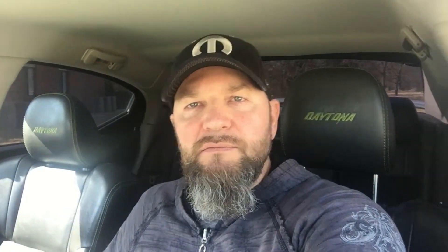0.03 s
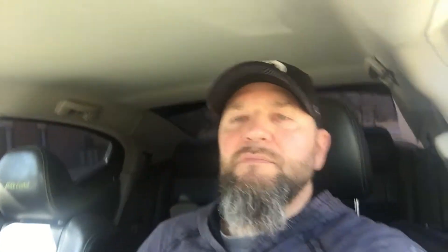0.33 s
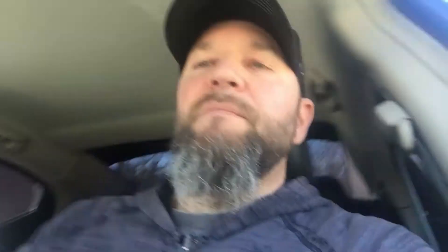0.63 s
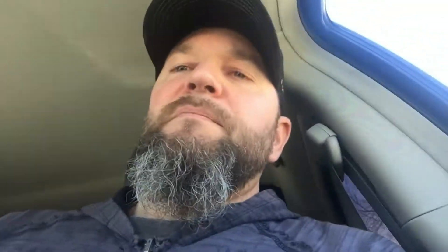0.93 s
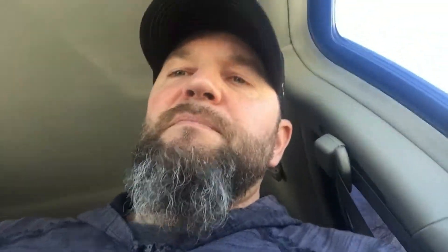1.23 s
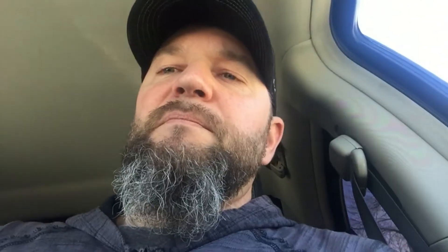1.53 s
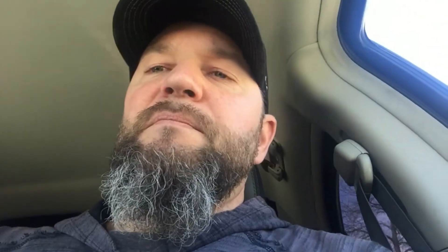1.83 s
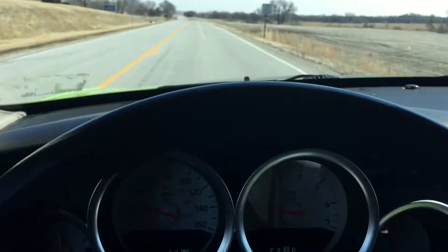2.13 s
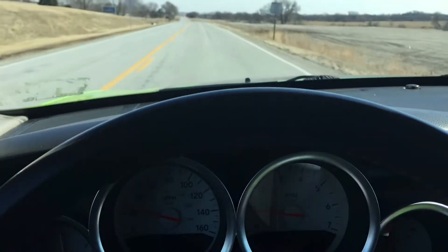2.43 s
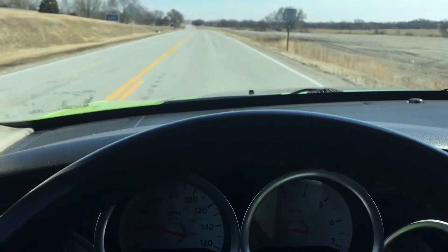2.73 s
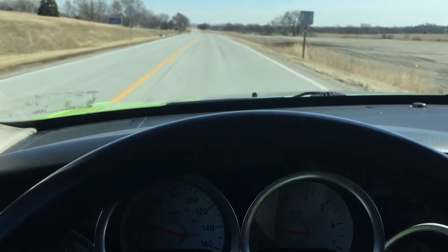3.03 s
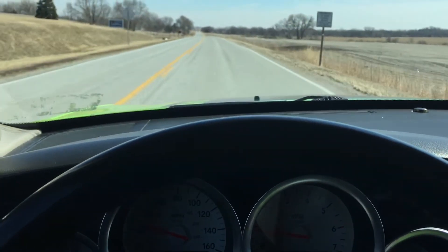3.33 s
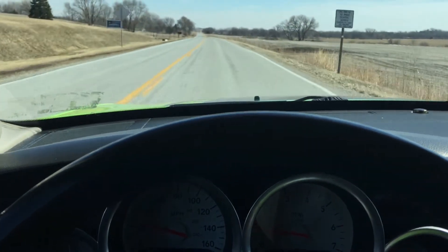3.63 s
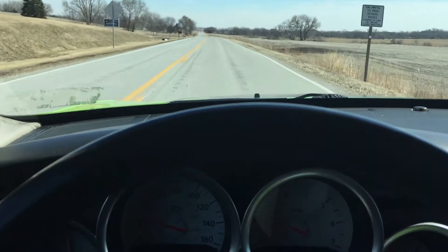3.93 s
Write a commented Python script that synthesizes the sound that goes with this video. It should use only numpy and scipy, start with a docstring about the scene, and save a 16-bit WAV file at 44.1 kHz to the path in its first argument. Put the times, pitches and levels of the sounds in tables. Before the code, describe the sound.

A car engine idles, heard from inside, then rumbles along a road and revs up.

```python
"""A deep engine drone inside a closed car at idle, with a thin flickering whistle and a rustling sleeve.
With a knock the scene cuts to the car rolling on a country road: tyres rumble, the body shakes.
The throttle opens, the firing rate climbs through the cabin's booming resonances,
and uneven firing pulses and gas noise break into a roar."""
import sys
import numpy as np
from scipy import signal
from scipy.fft import rfft, irfft, next_fast_len
from scipy.io import wavfile
from scipy.ndimage import map_coordinates

SR = 44100
rng = np.random.default_rng(int(sys.argv[2]) if len(sys.argv) > 2 else 0)


def log_audio(samples):
    """Write samples as a 16-bit WAV file to the path given in sys.argv[1]."""
    # one column per channel
    frames = np.atleast_2d(samples).T
    # limit to full scale, then quantise
    limited = np.clip(frames, -1, 1)
    pcm = np.round(limited * 32767).astype(np.int16)
    wavfile.write(sys.argv[1], SR, pcm)


N = 176400
ROAD_START_S, IDLE_END_S = 2.0905, 2.1055

# Firing rate at idle and pulling away: time_s, rate_hz
IDLE_RATE = [(0, 46.71), (.6, 46.82), (1.25, 48.2), (1.7, 47.63), (2.1, 46.8)]
REV_RATE = [(3.45, 57.85), (3.6, 71.02), (3.69, 92.3), (3.775, 116), (3.815, 124.2), (3.87, 133.3),
            (4, 140.6)]
# Engine and belt lines at idle: firing_multiple, level_db
IDLE_ORDERS = [(1, -25), (3 / 2, -45), (2, -36.5), (21 / 8, -40), (3, -44), (10 / 3, -46)]
# Lines under load: firing_multiple, relative_db
REV_ORDERS = [(1 / 2, 0), (3 / 4, 0.93), (5 / 4, 2), (9 / 4, -2.8), (13 / 4, -6.5)]
# Roar under load: time_s, gain_db
LOAD = [(3.3, -60.5), (3.45, -53), (3.62, -49.5), (3.79, -46.5), (3.9, -39.5), (4, -35.5)]
# Pulse strength per cylinder: relative_db
CYLINDERS_DB = [3, -3, 1, -2]
# Cabin boom: firing_rate_hz, level_db
CABIN_RESPONSE = [(58, -24), (71, -22.5), (80, -26.5), (92, -15.5), (106, -25), (117, -14.5), (124, -10),
                  (130, -21.5), (141, -27.5)]
# Rings at throttle opening: centre_s, sigma_s, pitch_hz, level_db
THROTTLE_RINGS = [(3.58, .05, 2170, -61.5), (3.63, .025, 1390, -54), (3.58, .035, 4200, -72),
                  (3.55, .07, 5450, -79)]
# Engine spectra: freq_hz, relative_db
EXHAUST_SPECTRUM = [(25, -39), (45, -20), (62, -9), (82, -18), (105, 5.5), (150, 4.5), (178, -5),
                    (250, -10.5), (330, -21), (600, -44.5)]
ENGINE_BAY_SPECTRUM = [(180, -25.5), (280, -6), (400, -7), (520, -8), (650, -7), (790, -11.5), (950, -12),
                       (1200, -19.5), (2600, -22.5), (3300, -33.5), (5000, -52.5)]
ROAR_SPECTRUM = [(110, -11), (175, 3), (230, 0.5), (310, -5.5), (400, -12), (445, -2), (490, -13.5),
                 (600, -4), (800, -14), (1150, -16), (1400, -19.5), (2000, -27.5), (2800, -31.5),
                 (4000, -40), (9000, -50.5), (15000, -70)]
INTAKE_SPECTRUM = [(900, -21), (1400, 3), (3000, -9), (4000, -10), (7000, -29.5), (12000, -35)]
# Road noise spectra: freq_hz, relative_db
ROAD_BOOM_SPECTRUM = [(20, -33.5), (32, -20), (45, 4.5), (58, -5), (80, -21), (150, -49.5)]
BODY_SPECTRUM = [(40, -24), (68, -0.5), (100, 1), (125, -3.5), (158, -3), (195, -11.5), (240, -23),
                 (400, -41.5)]
TYRE_SPECTRUM = [(130, -25), (210, -5), (270, -3), (350, 1.5), (450, -12), (600, -13), (820, -12.5),
                 (1000, -19.5), (1400, -26.5), (2000, -35.5), (2700, -41), (5000, -58)]
# Body swells on uneven road: centre_s, pitch_hz, level_db
BUMPS = [(2.2, 46, -29), (2.35, 100, -27), (2.41, 70, -26), (2.78, 50, -30), (2.87, 100, -29),
         (3.03, 46, -26), (3.2, 97, -29), (3.35, 58, -30), (3.435, 80, -24)]
# Buzzing cabin resonances: pitch_hz, width_hz, level_db
CABIN_BUZZ = [(592, 35, -63), (845, 45, -64), (922, 25, -66), (2100, 130, -79), (2644, 200, -76.5)]
# Whistle squeaks: start_s, length_s, pitch_hz, level_db
SQUEAKS = [(0, 0.12, 2840, -63), (0.196, 0.12, 2827, -59.5), (0.376, 0.21, 2720, -64),
           (0.797, 0.033, 2730, -62), (0.838, .15, 2873, -66.5), (1.133, 0.016, 2830, -65),
           (1.22, 0.017, 2880, -61), (1.302, 0.032, 2870, -66.5), (1.335, 0.05, 2750, -66),
           (1.878, .13, 2685, -62.5)]
# Bright cloth swishes: centre_s, sigma_s, level_db
SWISHES = [(0.254, .007, -44.5), (.335, .035, -55.5), (0.415, 0.035, -54)]
# Cloth spectra: freq_hz, relative_db
DRAG_SPECTRUM = [(150, -16.5), (280, 10.5), (500, -0.5), (900, -2.5), (1500, -19), (2400, -18), (4000, -32),
                 (9000, -46.5)]
SWISH_SPECTRUM = [(300, 2), (900, 16.5), (1500, 1.5), (2400, 4.5), (4500, -12), (7000, -15), (15000, -30)]
# Dull knocks and taps: start_s, level_db, pitch_hz, t60_s
KNOCKS = [(.599, -42, 1020, .03), (.608, -40, 900, .03), (1.078, -35.5, 479, .032), (1.443, -48, 760, .03),
          (1.629, -49, 650, .04)]
# Spectra of the knock at the cut and the steady hiss: freq_hz, relative_db
CUT_KNOCK_SPECTRUM = [(150, -13.5), (500, 5), (850, 1.5), (1300, -6.5), (1900, -20.5), (2250, -9.5),
                      (2600, -25.5), (3600, -23), (4500, -34.5), (15000, -41.5)]
HISS_SPECTRUM = [(1500, -6), (3500, 2), (5000, -1.5), (6500, -1), (10000, -7.5), (15500, -9)]


def engine_idle():
    """Steady firing drone, looser upper lines; exhaust and engine bay noise pulse with each firing."""
    firing_hz = curve(IDLE_RATE)
    drone = sum(amp(db + .4 * order * wobble(10))
                * tone(order * firing_hz, blur_rad=.02 * order ** 2, blur_hz=10)
                for order, db in IDLE_ORDERS)
    exhaust = amp(-39.3) * noise(EXHAUST_SPECTRUM) * puffs(firing_hz, depth=.45)
    bay = amp(-62 + 1.3 * wobble(25)) * noise(ENGINE_BAY_SPECTRUM) * puffs(firing_hz, depth=.2)
    hum = amp(-69 + 4 * wobble(16)) * narrow_noise(790, width_hz=110)
    hum += amp(-74) * tone(931, blur_rad=.5)
    return drone + exhaust + bay + hum


def engine_rev():
    """The firing line sweeps through cabin resonances; pulses, gas noise and whine grow with load."""
    firing_hz = curve(REV_RATE)
    throttle = np.clip((clock() - 3.44) / .075, 0, 1)
    flutter = unit(amp(2 * wobble(70)))
    cabin_db = np.interp(firing_hz, *np.transpose(CABIN_RESPONSE))
    boom = throttle * flutter * amp(cabin_db) * tone(firing_hz, blur_rad=.25)
    lines = sum(amp(db + 3.8 * wobble(30)) * tone(order * firing_hz, blur_rad=.93)
                for order, db in REV_ORDERS)
    firing = amp(-1) * firing_pulses(firing_hz)
    gas = amp(2) * noise(ROAR_SPECTRUM) * puffs(firing_hz / 2, depth=.17)
    whine = amp(-39) * narrow_noise(69 * firing_hz, width_hz=350)
    return boom + amp(curve(LOAD)) * (lines + firing + gas + whine)


def firing_pulses(firing_hz, cabin_t60_s=.093):
    """Four unequal cylinders fire in turn; each pulse reverberates in the cabin."""
    onsets = np.flatnonzero(np.diff(np.floor(np.cumsum(firing_hz) / SR)))
    pulses = np.zeros(N)
    pulses[onsets] = amp(np.resize(CYLINDERS_DB, len(onsets)))
    t = clock()[:SR // 8]
    reverb = rng.standard_normal(len(t)) * amp(-60 * t / cabin_t60_s)
    return coloured(signal.fftconvolve(pulses, reverb)[:N], ROAR_SPECTRUM)


def intake():
    """Air rushes in as the throttle opens, with faint ringing."""
    rush = amp(-62) * swell(3.6, sigma_s=.084) * noise(INTAKE_SPECTRUM)
    rings = sum(amp(db) * swell(centre_s, sigma_s) * narrow_noise(hz, width_hz=hz / 14)
                for centre_s, sigma_s, hz, db in THROTTLE_RINGS)
    return rush + rings


def road():
    """The road shakes the body; tyres rush, the cabin buzzes, a faint high shimmer wavers."""
    boom = amp(-30) * noise(ROAD_BOOM_SPECTRUM)
    body = amp(-28) * unit(amp(1.8 * wobble(14)) * noise(BODY_SPECTRUM))
    bumps = sum(amp(db) * swell(centre_s, sigma_s=.026) * tone(hz) for centre_s, hz, db in BUMPS)
    tyres = amp(-43 + 1.1 * wobble(11)) * noise(TYRE_SPECTRUM)
    buzz = sum(amp(db + 2.9 * wobble(20)) * narrow_noise(hz, width_hz)
               for hz, width_hz, db in CABIN_BUZZ)
    shimmer = amp(-80 + 2 * wobble(20)) * narrow_noise(3520 + 50 * wobble(10), width_hz=110)
    return boom + body + bumps + tyres + buzz + shimmer * (clock() > 2.22)


def cut_knock(thump_hz=125, thump_t60_s=.075):
    """A knock and low thump as the road begins; a sharp click as the idle ends."""
    impulse = np.diff(1.0 * (clock() > ROAD_START_S), prepend=0)
    knock = coloured(impulse, CUT_KNOCK_SPECTRUM)
    knock *= amp(-16.5) / np.abs(knock).max()
    t = np.maximum(clock() - ROAD_START_S, 0)
    envelope = amp(-8 - 60 * t / thump_t60_s) * (1 - np.exp(-t / .0034))
    thump = -envelope * np.sin(2 * np.pi * thump_hz * t)
    t = clock() - IDLE_END_S
    click = amp(-23.5) * (t > 0) * np.exp(-np.abs(t) / .003)
    return knock + thump + click


def sleeve(peak_s=.35, rise_db_per_s=14, fall_db_per_s=28.5):
    """Cloth drags over the seat with grainy swishes and catches once with a bright tick."""
    t = clock() - peak_s
    drag_db = -44.5 + np.minimum(rise_db_per_s * t, -fall_db_per_s * t)
    grain = unit(amp(2 * wobble(110) + 2.5 * wobble(900)))
    strokes = sum(amp(db) * swell(centre_s, sigma_s) for centre_s, sigma_s, db in SWISHES)
    tick = amp(-64.5) * swell(.231, sigma_s=.005) * narrow_noise(5400, width_hz=3000)
    return grain * (amp(drag_db) * noise(DRAG_SPECTRUM) + strokes * noise(SWISH_SPECTRUM)) + tick


def knocks():
    """Dull knocks and taps: each a damped ring with some grit."""
    out = np.zeros(N)
    for start_s, db, hz, t60_s in KNOCKS:
        t = np.maximum(clock() - start_s, 0)
        grit = amp(-4) * noise([(200, -3), (hz, 0), (2 * hz, -14), (4 * hz, -32)])
        envelope = amp(db - 60 * t / t60_s) * (1 - np.exp(-t / .001))
        out += envelope * (np.sin(2 * np.pi * hz * t) + grit)
    return out


def whistle():
    """A thin, hoarse whistle flutters and swells into short squeaks."""
    out = amp(-75.5 + 3.5 * wobble(40)) * narrow_noise(2820, width_hz=170)
    for start_s, length_s, hz, db in SQUEAKS:
        gate = np.exp(-(2 * (clock() - start_s) / length_s - 1) ** 4)
        envelope = gate * amp(db + 2 * wobble(70))
        out += envelope * unit(tone(hz) + .75 * narrow_noise(hz, width_hz=170))
    return out


def hiss():
    """Faint steady hiss."""
    return amp(-75.5) * noise(HISS_SPECTRUM)


def amp(db):
    """Decibels to gain."""
    return 10 ** (np.asarray(db) / 20)


def unit(x):
    """Scale to rms 1."""
    return x / np.sqrt(np.mean(x ** 2) + 1e-20)


def clock():
    """Sample times in seconds."""
    return np.arange(N) / SR


def curve(points):
    """Interpolate (time_s, value) points per sample."""
    return np.interp(clock(), *np.transpose(points))


def swell(centre_s, sigma_s):
    """Gaussian envelope, peak 1."""
    return np.exp(-.5 * ((clock() - centre_s) / sigma_s) ** 2)


def puffs(rate_hz, depth):
    """Gain that swells once per cycle, rms 1."""
    return unit(np.exp(depth * np.cos(phase_rad(rate_hz))))


def wobble(rate_hz):
    """Smooth random curve with knots at rate_hz."""
    return map_coordinates(rng.standard_normal(4096), [clock() * rate_hz + 3], mode="wrap")


def phase_rad(hz):
    """Running phase of a fixed or gliding frequency."""
    return 2 * np.pi * np.cumsum(hz + np.zeros(N)) / SR


def tone(hz, blur_rad=0., blur_hz=40):
    """Sine with wandering phase, rms 1."""
    return -np.sqrt(2) * np.cos(phase_rad(hz) + blur_rad * wobble(blur_hz))


def narrow_noise(hz, width_hz):
    """Noise band around hz, rms 1: a resonance driven by friction or flow."""
    phase = phase_rad(hz)
    return unit(wobble(width_hz) * np.cos(phase) + wobble(width_hz) * np.sin(phase))


def noise(spectrum):
    """Coloured noise, rms 1."""
    return coloured(rng.standard_normal(N + SR), spectrum)


def coloured(x, spectrum):
    """Minimum-phase filter through (freq_hz, relative_db) points; output rms 1."""
    size = next_fast_len(N + SR // 2) // 2 * 2
    hz, db = np.transpose(spectrum)
    log_bins = np.log(np.fft.rfftfreq(size, 1 / SR) + 1)
    log_knots = np.log(np.r_[hz[0] / 2, hz, hz[-1] * 2])
    gain_db = np.interp(log_bins, log_knots, np.r_[-120, db, -120])
    cepstrum = irfft(np.log(amp(gain_db)), size)
    cepstrum[1:size // 2] *= 2  # fold to make it causal
    cepstrum[size // 2 + 1:] = 0
    response = np.exp(rfft(cepstrum))
    return unit(irfft(rfft(np.resize(x, size)) * response, size)[:N])


def scene():
    """Idle, then an abrupt cut to the road; mono."""
    idle_gate = np.clip((IDLE_END_S - clock()) / .0023, 0, 1)
    road_gate = np.clip((clock() - ROAD_START_S) / .0013, 0, 1)
    parked = idle_gate * (engine_idle() + whistle() + sleeve())
    driving = road_gate * (road() + engine_rev() + intake())
    return (parked + driving + knocks() + cut_knock() + hiss())[None]


def record(dry):
    """Brick-wall low-pass."""
    cutoff_hz = 15750
    size = next_fast_len(N + SR // 2)
    passband = np.fft.rfftfreq(size, 1 / SR) < cutoff_hz
    return irfft(rfft(dry, size) * passband, size)[..., :N]


dry = scene()
out = record(dry)
log_audio(out)
```